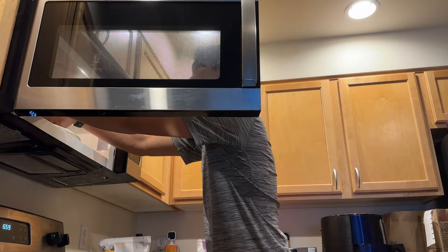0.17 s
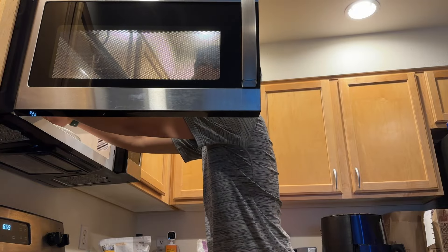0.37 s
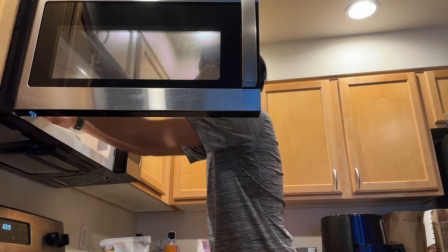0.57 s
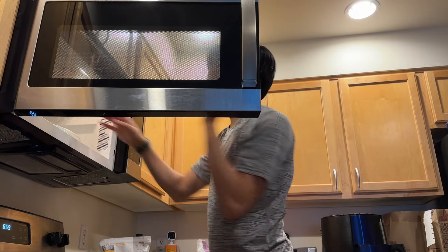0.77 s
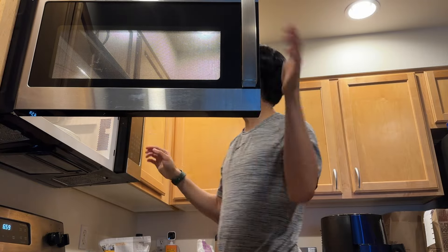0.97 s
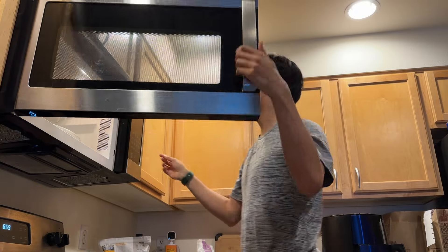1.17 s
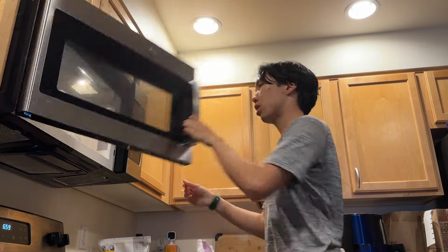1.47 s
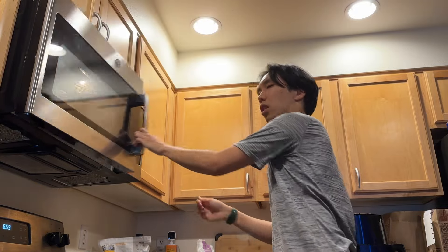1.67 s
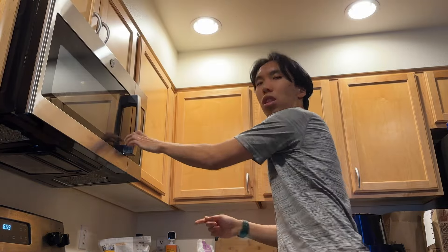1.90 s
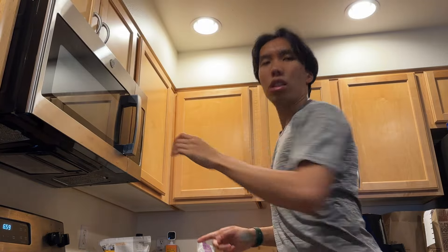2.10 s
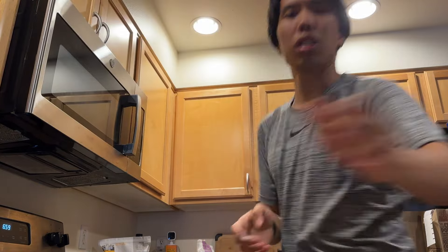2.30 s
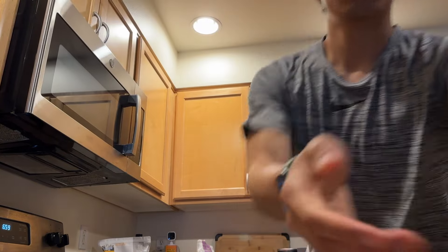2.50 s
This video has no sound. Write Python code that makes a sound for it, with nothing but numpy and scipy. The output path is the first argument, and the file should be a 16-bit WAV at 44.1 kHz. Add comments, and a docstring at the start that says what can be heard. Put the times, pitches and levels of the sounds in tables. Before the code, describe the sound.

A microwave door shuts with a loud thunk after a container is softly set inside.

```python
"""A microwave door swings shut: its latch hooks ride up their ramps and snap in, the door thuds
against the steel case, and the small kitchen rings on. Before that, a food container slides into the
oven and is set down softly, and a hand takes the door by its handle. Knocks are bursts of noise, the
heavier ones with fading tones added. Clothes rustle over a low room rumble with a soft hum."""
import sys
import numpy as np
from scipy import signal
from scipy.io import wavfile

SR = 44100
rng = np.random.default_rng(int(sys.argv[2]) if len(sys.argv) > 2 else 0)


def unload_wav(signal):
    """Save mono or channel-first audio to the path in sys.argv[1] as 16-bit WAV at rate SR, clipped to [-1, 1]."""
    wavfile.write(
        sys.argv[1],
        SR,
        np.round(np.clip(np.atleast_2d(signal).T, -1, 1) * 32767).astype(np.int16),
    )


N = 116865
TIME = np.arange(N) / SR
LIGHT_ECHO_DB = -8.5  # room echo of small taps, scuffs and flicks


def door():
    """The door pushes air aside, latches, thuds against the case and bounces, setting both ringing."""
    # the door meets the case and bounces: (time [s], level [dB], tilt [dB/octave], fade [s])
    hits = [(1.7650, -10, -3, 0.12), (1.7840, -31, 7.5, 0.3), (1.8170, -20, -2.5, 0.2)]
    # tone of the thud: (frequency [Hz], level [dB])
    colour = [(30, -20), (60, -19.5), (130, -6.5), (800, -6.5), (1700, -18.5), (6000, -24), (14000, -40.5)]
    # the door's own tones: (frequency [Hz], level [dB], fade [s])
    door_tones = [(120.3, -19.5, 0.81), (151, -17.5, 0.79), (210, -12.5, 0.34), (263.7, -20.5, 0.89),
                  (280.7, -14, 0.35), (319, -13.5, 0.26), (380.5, -21.5, 0.32), (383, -42, 2.37),
                  (402, -41.5, 2.2), (442.7, -10.5, 0.15)]
    # boom of the case and the cupboard behind it: (frequency [Hz], level [dB], fade [s])
    case_tones = [(54.6, -21.5, 1), (66.7, -6.5, 0.12), (90, -15.5, 0.22), (125, -11.5, 0.13),
                  (156, -4, 0.087)]
    # the panel drums as it bounces against the latch: (frequency [Hz], level [dB], fade [s])
    bounce_tones = [(241, -12, 0.29)]
    # where the panels and latch ring: (frequency [Hz], width [Hz], level [dB])
    panel_peaks = [(640, 28, -2.5), (832, 21, -3), (893, 45, -4), (1060, 42, 1.5), (1213, 76, -1),
                   (1815, 14, -1.5), (1994, 90, -1.5), (6510, 180, -6)]
    air = air_push()
    impact = latch() + knocks(hits, colour, echo_db=-12)
    boom = sum(ring(hit[0], tones) for hit, tones in zip(hits, (door_tones, case_tones, bounce_tones)))
    return air + resonate(impact, panel_peaks) + boom


def latch():
    """The hooks grate along their ramps, ride over the catches and snap in."""
    # hooks touch the ramps: (time [s], level [dB], tilt [dB/octave], fade [s])
    ramp_hits = [(1.7015, -24.5, -0.5, 0.11), (1.7110, -28.5, 0, 0.35)]
    # tone of the grating: (frequency [Hz], level [dB])
    ramp_colour = [(60, -10.5), (400, -1.5), (2200, -4), (3000, -5), (6000, -2), (8000, -19), (13500, -16)]
    # hooks snap in: (time [s], level [dB], tilt [dB/octave], fade [s])
    snaps = [(1.7358, -24, 0.1, 0.4), (1.7530, -17.5, -0.3, 0.1), (1.7617, -13.5, 1.0, 0.067),
             (1.7655, -21, 0.3, 0.054)]
    # tone of the snaps: (frequency [Hz], level [dB])
    snap_colour = [(50, -7), (200, -7), (800, -4.5), (2000, -4), (3000, -10.5), (5000, -7.5), (9500, -10.5),
                   (13500, -12)]
    return knocks(ramp_hits, ramp_colour, echo_db=-16.5) + knocks(snaps, snap_colour, echo_db=-16.5)


def air_push():
    """The swinging door pushes air into the oven with a low whoosh."""
    # the rush of air: (time [s], level [dB])
    loudness = [(1.58, -77.5), (1.66, -47), (1.72, -45.5), (1.78, -69)]
    # its tone: (frequency [Hz], level [dB])
    colour = [(50, -23), (140, 3.5), (350, -32), (2000, -37)]
    return swish(loudness, colour)


def handle():
    """A soft palm sets the open door wobbling, then the hinge ticks as it starts to turn."""
    # the hand lands: (time [s], level [dB], tilt [dB/octave], fade [s])
    grabs = [(1.0845, -49, 4, 0.088), (1.1130, -40, -2, 0.028)]
    # dull tone of the palm: (frequency [Hz], level [dB])
    grab_colour = [(40, -7.5), (300, 1.5), (650, -9), (1300, -23), (14000, -35)]
    # the open door's tones: (frequency [Hz], level [dB], fade [s])
    door_tones = [(69.5, -36, 1), (234.7, -32.5, 0.24), (286, -34.5, 0.38)]
    # hinge ticks: (time [s], level [dB], tilt [dB/octave], fade [s])
    ticks = [(1.1635, -42.5, 1.5, 0.03), (1.1682, -43, -1.5, 0.054)]
    # their tone: (frequency [Hz], level [dB])
    tick_colour = [(100, -43), (600, -0.5), (2000, -5), (10000, -6.5), (15000, -19)]
    # the hinge's thin ring: (frequency [Hz], width [Hz], level [dB])
    hinge_peaks = [(3460, 210, 4.5)]
    palm = knocks(grabs, grab_colour, echo_db=-10) + ring_each_hit(grabs, door_tones)
    return palm + resonate(knocks(ticks, tick_colour, echo_db=-18.5), hinge_peaks)


def container_slide():
    """The container nudges and scuffs the turntable as it slides into the hollow oven."""
    # the nudge: (time [s], level [dB], tilt [dB/octave], fade [s])
    nudges = [(.1082, -56, 2, 0.11)]
    # its tone: (frequency [Hz], level [dB])
    nudge_colour = [(1500, -6), (3600, 2.5), (6500, -15.5)]
    # the scuffs: (time [s], level [dB], tilt [dB/octave], fade [s])
    scuffs = [(.2030, -55.5, 1, 0.49), (.4310, -53, -2.5, 0.39)]
    # their tone: (frequency [Hz], level [dB])
    scuff_colour = [(300, -4.5), (900, 1.5), (2000, -4), (12000, -7.5)]
    # the sliding scrape: (time [s], level [dB])
    slide = [(0, -72.5), (.27, -68.5), (.33, -59), (.42, -62.5), (.48, -52.5), (.6, -74)]
    # its tone: (frequency [Hz], level [dB])
    slide_colour = [(300, -16.5), (1000, 3.5), (2000, -4), (11000, -2), (15000, -6.5)]
    # where the oven's hollow rings: (frequency [Hz], width [Hz], level [dB])
    oven_peaks = [(790, 79, 0.5), (1193, 77, -2.5)]
    touches = knocks(nudges, nudge_colour, LIGHT_ECHO_DB) + knocks(scuffs, scuff_colour, LIGHT_ECHO_DB)
    return resonate(swish(slide, slide_colour) + touches, oven_peaks)


def container_landing():
    """The container lands with a bump and clinks as the hands let go."""
    # it lands and settles: (time [s], level [dB], tilt [dB/octave], fade [s])
    hits = [(.4560, -44, 1, 0.11), (.5020, -59, 3.5, 0.22)]
    # tone of the bump: (frequency [Hz], level [dB])
    colour = [(150, 6), (450, 2), (1100, 2.5), (2000, -7.5), (6000, -10.5), (15000, -12.5)]
    # low tones of the landing: (frequency [Hz], level [dB], fade [s])
    tones = [(154.8, -31, 0.59), (349.3, -31.5, 0.37), (373.2, -33.5, 0.45)]
    # a light tap: (time [s], level [dB], tilt [dB/octave], fade [s])
    taps = [(.6990, -51, 1.23, 0.19)]
    # its tone: (frequency [Hz], level [dB])
    tap_colour = [(100, -9), (500, 3), (850, 4), (2000, -2.5), (4000, -6.5), (5900, -2.5), (11000, -0.5),
                  (15000, -3)]
    # where the container rings: (frequency [Hz], width [Hz], level [dB])
    clink_peaks = [(870, 14, 9.5), (3350, 30, 7.5), (5770, 510, 8.7)]
    bump = knocks(hits, colour, echo_db=-4) + ring_each_hit(hits, tones)
    clink = resonate(knocks(taps, tap_colour, LIGHT_ECHO_DB), clink_peaks)
    return bump + clink


def clothes():
    """A shirt rubs and flicks as the body moves."""
    # the rustle: (time [s], level [dB])
    rustle = [(0, -56.5), (.08, -70.5), (.6, -72), (1.0, -99), (1.31, -82), (1.39, -68), (1.56, -104),
              (2.16, -60), (2.47, -60), (2.65, -65)]
    # tone of the cloth: (frequency [Hz], level [dB])
    colour = [(100, 1.5), (350, 1), (1400, -0.5), (3000, -8.5), (10000, -9), (15000, -21)]
    # folds flick: (time [s], level [dB], tilt [dB/octave], fade [s])
    flicks = [(2.178, -58, 1, 0.44), (2.332, -54, 1.5, 0.099), (2.445, -61, 2, 0.69)]
    return swish(rustle, colour) + knocks(flicks, colour, LIGHT_ECHO_DB)


def kitchen():
    """A low rumble, in which a soft wavering hum comes up."""
    # room rumble: (frequency [Hz], level [dB])
    colour = [(25, -87), (55, -57), (110, -64), (230, -61.5), (500, -69), (1200, -80), (1900, -105),
              (6500, -86.5), (9000, -108)]
    # the hum, a narrow slice of the rumble: (frequency [Hz], width [Hz], level [dB])
    hum_peaks = [(218.2, 6.4, 11)]
    rumble = steady_noise(colour)
    hum = resonate(rumble, hum_peaks) - rumble
    swell = np.clip(2 * (TIME - 0.65), 0, 1)  # rises for half a second from 0.65 s
    return rumble + hum * swell


def knocks(hits, colour, echo_db):
    """Each hit is a noise burst and its room echo. Tilt adds treble; fade is a 60 dB fall at 1 kHz."""
    # how long the kitchen's echo takes to fall 60 dB: (frequency [Hz], fade [s])
    room_fade = [(60, 0.79), (250, 0.79), (600, 0.73), (5500, 0.7), (9000, 0.49), (15000, 0.3)]
    echo_build_s, attack_cycles = 0.0035, 0.44
    out, t = np.zeros((2, N)), TIME[:SR]
    for hz, band in noise_bands():
        power = np.zeros(N + SR)
        attack = 1 - np.exp(-t * hz / attack_cycles)
        echo = from_db(echo_db - 60 * t / at_hz(room_fade, hz)) * (1 - np.exp(-t / echo_build_s))
        khz = hz / 1000
        for time_s, db, tilt, fade_s in hits:
            direct = from_db(-60 * t * khz ** 0.14 / fade_s)  # the highs die first
            gain = from_db(db + tilt * np.log2(khz))
            start = int(time_s * SR)
            power[start:start + SR] += (gain * attack) ** 2 * (direct ** 2 + echo ** 2)
        out += band * np.sqrt(power[:N]) * from_db(at_hz(colour, hz)) * pan(hz)
    return out


def ring(time_s, tones):
    """A struck object rings with pure tones, each falling 60 dB in its fade time."""
    left_lead_s, rise_s = 0.00006, 0.0013
    t = np.maximum(TIME - time_s + np.array([[left_lead_s], [0]]), 0)
    ringing = sum(pan(hz) * from_db(db - 60 * t / fade_s) * np.sin(2 * np.pi * hz * t)
                  for hz, db, fade_s in tones)
    return ringing * (1 - np.exp(-t / rise_s))


def ring_each_hit(hits, tones):
    """Every hit starts the tones again, weaker hits more softly."""
    loudest = max(db for _, db, _, _ in hits)
    return sum(from_db(db - loudest) * ring(time_s, tones) for time_s, db, _, _ in hits)


def resonate(sound, peaks):
    """Adds narrow bands of the sound back to it, so it rings at those pitches."""
    out = sound
    for hz, width, db in peaks:
        decay = np.exp(-np.pi * width / SR)
        feedback = [1, -2 * decay * np.cos(2 * np.pi * hz / SR), decay ** 2]
        ringing = (1 - decay ** 2) / 2 * signal.lfilter([1, 0, -1], feedback, sound + 1e-18)
        out = out + from_db(db) * ringing
    return out


def swish(loudness, colour):
    """Rubbing or rushing air: noise that swells and fades along a loudness curve."""
    return steady_noise(colour) * from_db(np.interp(TIME, *np.transpose(loudness)))


def steady_noise(colour):
    """Even noise whose colour sets the level of each band from bass to treble."""
    return sum(from_db(at_hz(colour, hz)) * pan(hz) * band for hz, band in noise_bands())


def noise_bands():
    """Yields equally strong half-octave bands of stereo noise, left and right most alike in the bass."""
    # how alike the two sides are: (frequency [Hz], likeness [0 to 1])
    likeness = [(60, 0.86), (180, 0.86), (400, 0.36), (900, 0.11), (2500, 0.26), (6000, 0.1), (14000, 0.4)]
    edges_hz = 22 * 2 ** (np.arange(20) / 2)
    white = rng.standard_normal((2, 2, N))
    for k, (low, high) in enumerate(zip(edges_hz, edges_hz[1:])):
        band_pass = signal.butter(2, [low, high], "band", fs=SR, output="sos")
        mid, side = signal.sosfilt(band_pass, white[k % 2])
        hz = np.sqrt(low * high)
        alike = at_hz(likeness, hz)
        band = np.sqrt(1 + alike) * mid + np.sqrt(1 - alike) * side * np.array([[1], [-1]])
        yield hz, band / band.std()


def pan(hz):
    """Left and right gain: the oven stands to the left."""
    # how much louder the left side is: (frequency [Hz], left minus right [dB])
    balance = [(50, -0.5), (180, 6), (700, 2.5), (1500, 2), (5500, 5.5), (9000, 1), (15000, -0.5)]
    return from_db(at_hz(balance, hz) * np.array([[.5], [-.5]]))


def at_hz(points, hz):
    """Reads between a table's rows, with octaves evenly spaced."""
    freqs, values = np.transpose(points)
    return np.interp(np.log(hz), np.log(freqs), values)


def from_db(db):
    """Turns decibels into a gain."""
    return 10 ** (np.asarray(db) / 20)


def scene():
    """All the sounds in the kitchen, added together."""
    return door() + handle() + container_slide() + container_landing() + clothes() + kitchen()


def record(dry):
    """The microphone drops the deepest bass, clips any peak too loud for it and cuts the top treble."""
    low_cut_hz, high_cut_hz = 42.6, 15800
    trimmed = signal.sosfilt(signal.butter(8, low_cut_hz, "high", fs=SR, output="sos"), dry)
    clipped = np.clip(trimmed, -1, 1)
    return signal.sosfilt(signal.ellip(10, .1, 70, high_cut_hz, fs=SR, output="sos"), clipped)


dry = scene()
out = record(dry)
unload_wav(out)
```